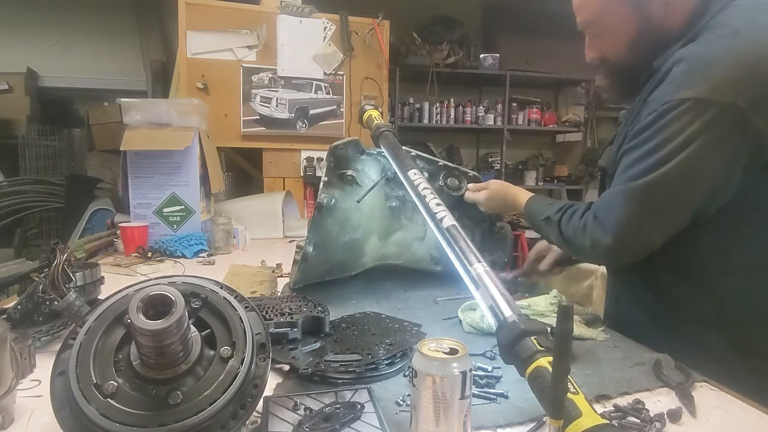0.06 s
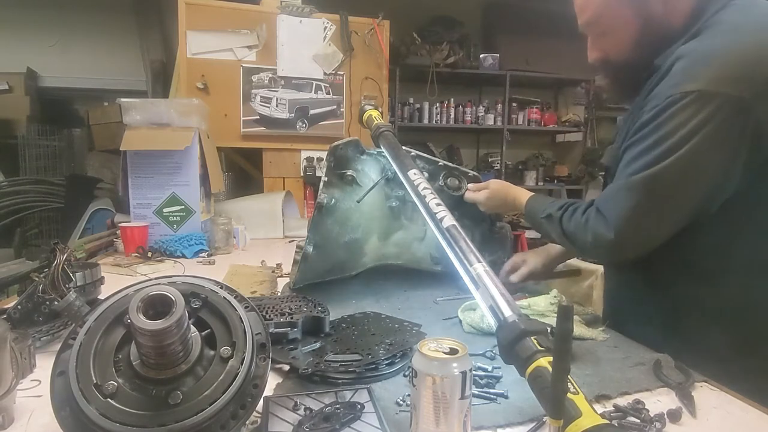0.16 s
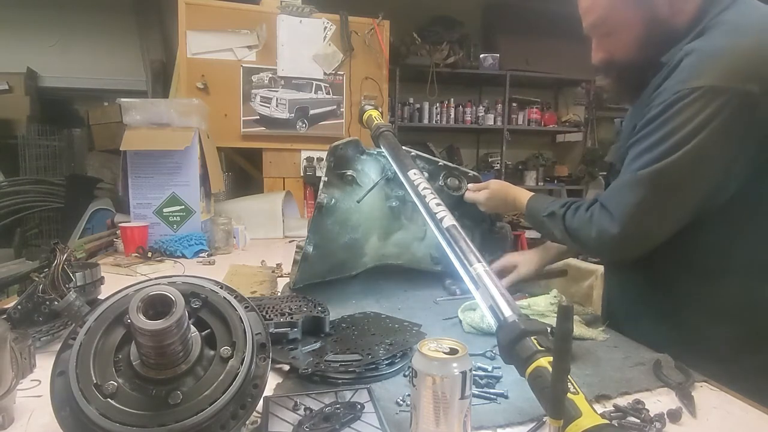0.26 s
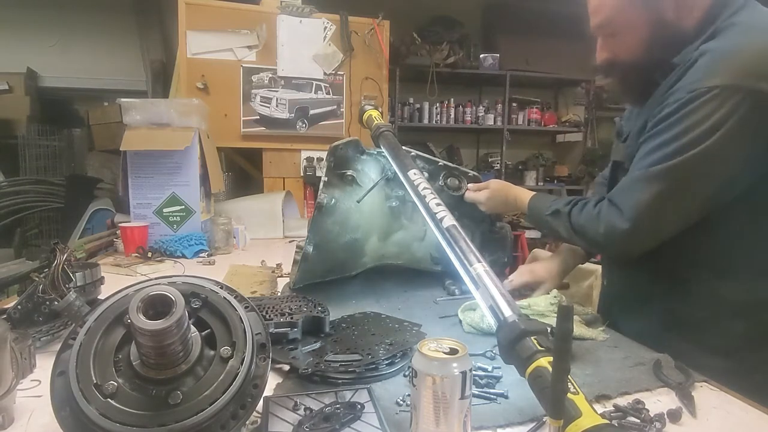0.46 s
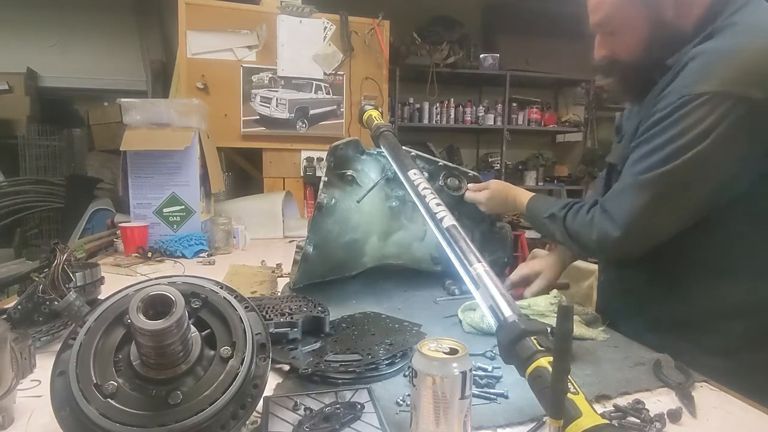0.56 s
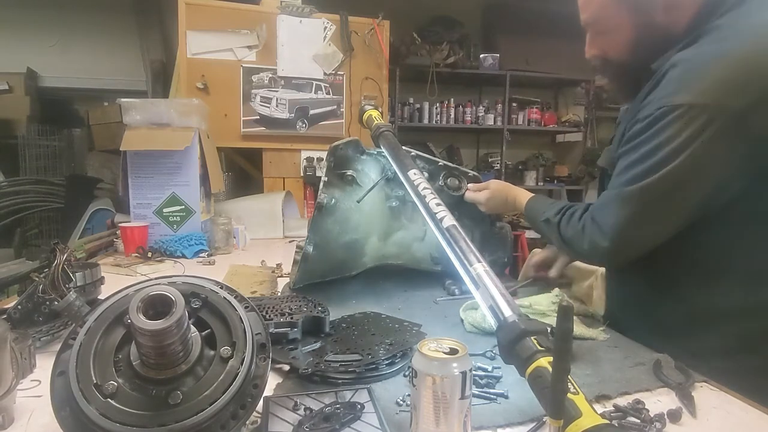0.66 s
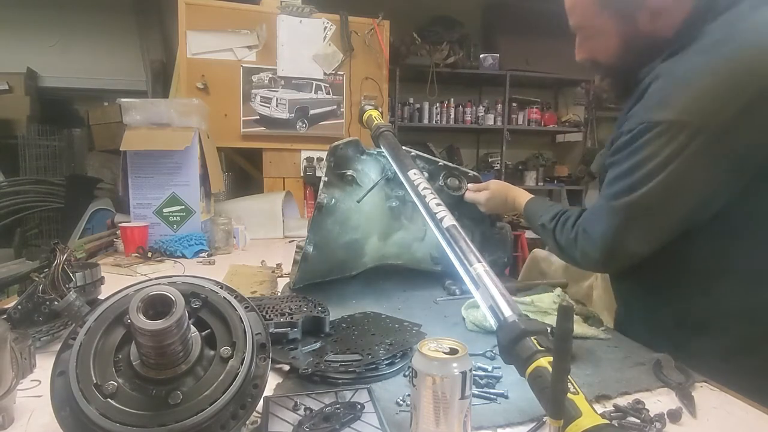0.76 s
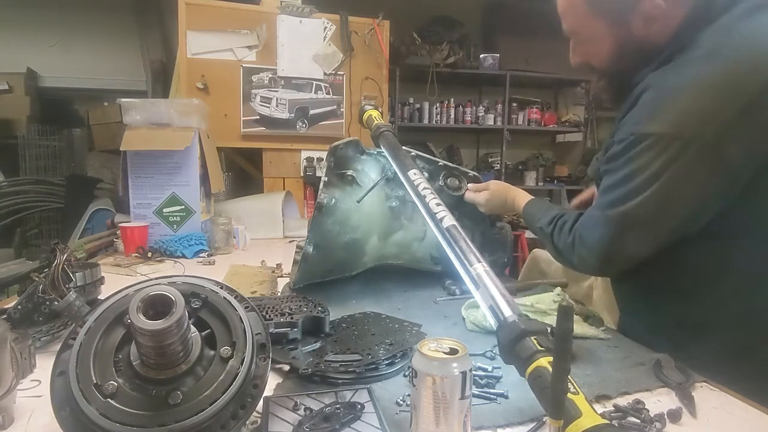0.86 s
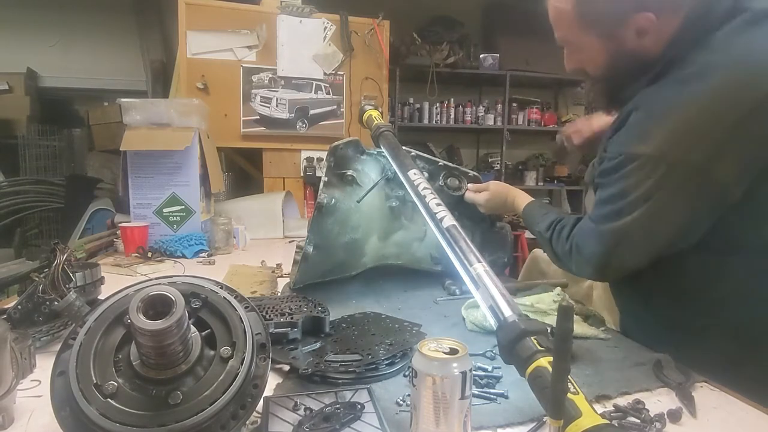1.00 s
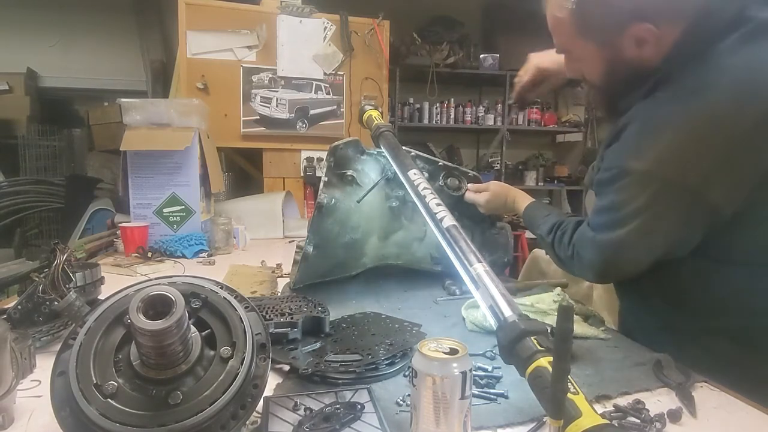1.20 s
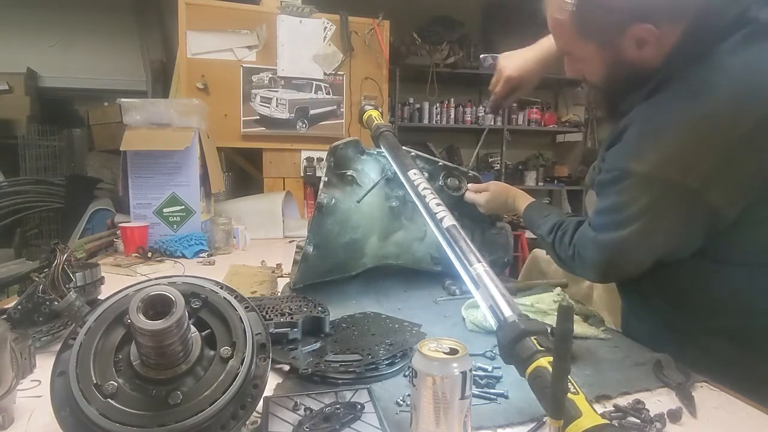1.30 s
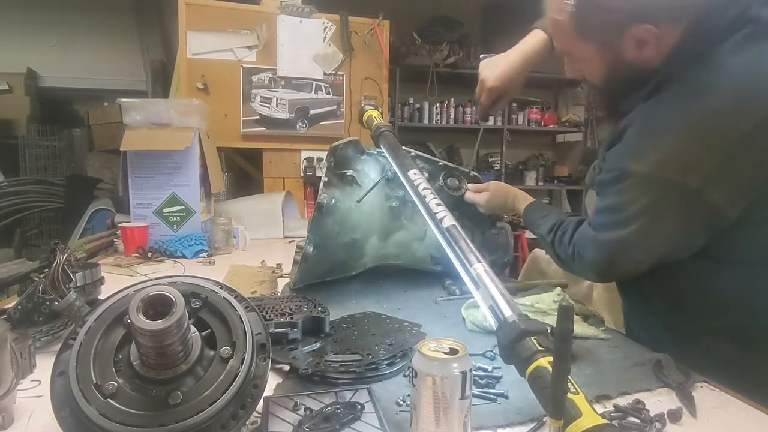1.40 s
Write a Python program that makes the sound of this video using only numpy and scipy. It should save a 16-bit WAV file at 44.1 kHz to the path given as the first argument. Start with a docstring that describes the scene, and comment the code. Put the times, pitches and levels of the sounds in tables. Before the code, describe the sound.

A hammer is set down on a workbench: a chattering metal knock at 0.2 seconds, dull bumps around 0.3, a brief scrape, then a hard, ringing clunk just before 0.5. A steel punch slides with a faint ring near 0.9 seconds and lightly taps a metal case at about 0.8, 1.0 and 1.35. Sleeves swish softly over the low, steady hum of air in a small garage.

```python
"""A chattering knock on metal, over the low hum of air in a small garage: a hammer is being put down
on a cluttered workbench beside a metal gear case. It bumps the bench top, scrapes briefly in tiny slips
and lands with a hard, ringing clunk. Sleeves swish, a steel punch slides with a faint ring and taps
the case lightly. The clutter and the room answer the hits, and the treble flickers on the right."""
import sys
import numpy as np
from scipy import signal
from scipy.fft import rfft, irfft, next_fast_len
from scipy.io import wavfile

SR = 44100
rng = np.random.default_rng(int(sys.argv[2]) if len(sys.argv) > 2 else 0)


def int16_out(signal):
    """Quantize to a 16-bit WAV file."""
    q = np.round(np.clip(np.atleast_2d(signal).T, -1, 1) * 32767)
    wavfile.write(sys.argv[1], SR, q.astype(np.int16))


N = 63945
SIDES = np.array([[.5], [-.5]])  # left and right share of a pan or a lag


def amp(db):
    """Decibels to gain."""
    return 10 ** (np.asarray(db) / 20)


def unit(x):
    """Scale to rms 1."""
    return x / np.sqrt(np.mean(x ** 2) + 1e-20)


def clock():
    """Time of each sample in seconds."""
    return np.arange(N) / SR


def along(curve, hz):
    """Read a curve of (freq_hz, value) points on a log frequency axis."""
    freqs, values = np.transpose(curve)
    return np.interp(np.log(hz + 1), np.log(freqs + 1), values)


def filtered(x, response):
    """EQ x with a gain given as a function of frequency."""
    size = next_fast_len(N + SR // 2)
    return irfft(rfft(x, size) * response(np.fft.rfftfreq(size, 1 / SR)), size)[..., :N]


# How alike the two sides of a noise are: freq_hz, correlation
STEREO_LIKENESS = [(60, 0.96), (130, .88), (290, .75), (640, 0.65), (1400, 0), (15000, 0.011)]
def noise(spectrum):
    """Coloured stereo noise of rms 1, centred in the bass and wide in the treble."""
    def mid_side_eq(hz):
        angle = np.arccos(np.clip(along(STEREO_LIKENESS, hz), -1, 1)) / 2
        return amp(along(spectrum, hz)) * [np.cos(angle), np.sin(angle)]
    mid, side = filtered(rng.standard_normal((2, N)), mid_side_eq)
    return unit(np.array([mid + side, mid - side]))


def place(x, pan_db, lag_ms=0):
    """Make the left louder by pan_db and later by lag_ms."""
    lag_s = lag_ms / 1000
    return amp(pan_db * SIDES) * filtered(x, lambda hz: np.exp(-2j * np.pi * hz * lag_s * SIDES))


def swell(peak_s, width_s):
    """A bell-shaped rise and fall."""
    return np.exp(-.5 * ((clock() - peak_s) / width_s) ** 2)


def ring(contacts, modes, attack_cycles):
    """Every contact starts the modes anew; a long, soft contact misses the high ones."""
    t = np.arange(SR // 4) / SR
    out = np.zeros((2, N))
    for start_s, level_db, contact_ms in contacts:
        contact_s = contact_ms / 1000
        body = 0
        for hz, mode_db, t60_s, pan_db in modes:
            decay = amp(level_db + mode_db - 60 * t / t60_s + pan_db * SIDES)
            attack = 1 - np.exp(-(hz * t / attack_cycles) ** 2)
            softening = 1 + (np.pi * hz * contact_s) ** 2
            body += attack * decay * np.sin(2 * np.pi * hz * t) / softening
        out += [np.interp(clock() - start_s, t, side, left=0, right=0) for side in body]
    return out


def crack(contacts, spectrum, t60_s, rise_s=0.003):
    """A short burst of noise at every contact."""
    envelope = 0
    for start_s, level_db, _ in contacts:
        age = clock() - start_s
        envelope += np.clip(age / rise_s, 0, 1) * amp(level_db - 60 * abs(age) / t60_s)
    return noise(spectrum) * envelope


def radiate(x, low_hz):
    """Low cut: a body sheds little sound below its lowest mode."""
    return signal.sosfilt(signal.butter(2, low_hz, 'high', fs=SR, output='sos'), x)


# EQ of the room tone and of the hiss: freq_hz, gain_db
AIR_EQ = [(20, -26), (45, -0.5), (62, 9), (110, 5), (170, -2), (280, -2), (450, -9.5), (1000, -11),
          (2500, -15), (6000, -20.5), (10000, -24.5), (16000, -46)]
HISS_EQ = [(300, -63), (5000, -19.5), (8500, -10), (12000, -6), (15000, 1), (16500, -1.5)]
# Fader moves on the hiss, ahead of its trim: time_s, level_db
HISS_FADER = [(0.0, -70), (0.176, -66), (0.302, -56.5), (0.314, -50), (0.322, -51), (0.366, -51),
              (0.394, -66.5), (0.406, -52), (0.444, -65), (0.472, -56), (0.48, -69), (0.496, -62),
              (0.524, -67), (0.726, -75), (0.786, -59.5), (0.84, -66.5), (0.98, -66.5), (1.05, -61),
              (1.142, -76.5), (1.19, -63), (1.34, -68.5), (1.45, -68.5)]
def background(air_db=-54, hiss_trim_db=-2):
    """Steady workshop air, and a thin treble hiss that flickers on the right."""
    times, levels_db = np.transpose(HISS_FADER)
    hiss = amp(np.interp(clock(), times, levels_db) + hiss_trim_db) * noise(HISS_EQ)
    air = amp(air_db) * noise(AIR_EQ)
    return place(air, pan_db=1) + place(hiss, pan_db=-12.5)


# Tone of the reverb: freq_hz, gain_db
ROOM_EQ = [(40, -1), (200, 1.5), (400, 0), (650, 0.5), (1200, 2), (2500, -0.5), (16000, -6)]
# Length of its tail: freq_hz, t60_s
ROOM_DECAY = [(100, 1), (220, 1), (650, 0.28), (2500, 0.47), (6000, 0.47), (14000, 0.2)]
def garage(x, early_db, tail_db, early_t60_s=0.092, predelay_s=0.0047):
    """Add quick reflections from the clutter and the tail of the room."""
    t = clock()
    hz, frame_s, bands = signal.stft(noise(ROOM_EQ), SR, nperseg=256)
    decay = amp(-60 * frame_s / along(ROOM_DECAY, hz)[:, None])
    tail = signal.istft(bands * decay, SR, nperseg=256)[1][:, :N]
    early = noise(ROOM_EQ) * amp(-60 * t / early_t60_s)
    arrived = t > predelay_s
    impulse = (amp(early_db) * unit(early * arrived) + amp(tail_db) * unit(tail * arrived)) / np.sqrt(N)
    return x + signal.fftconvolve(x, impulse, axes=1)[:, :N]


# Tone of the cloth: freq_hz, gain_db
CLOTH_EQ = [(200, -2), (470, 5.5), (640, 0), (850, -5.5), (1260, 2), (1700, -7), (2400, 0.5), (4000, -5.5),
            (7000, -11), (11000, -24), (16000, -23)]
# Arm moves: peak_s, width_s, level_db
ARM_MOVES = [(0.305, 0.086, -50.5), (.60, 0.027, -54), (1.019, 0.052, -50.5)]
def sleeves():
    """Cloth swishes with each move of the arm."""
    return noise(CLOTH_EQ) * sum(amp(db) * swell(peak_s, width_s) for peak_s, width_s, db in ARM_MOVES)


def punch_slide(pitch_hz=2240, peak_s=0.871, rise_s=0.046, fade_s=0.14, level_db=-60):
    """The steel punch sings with a fluttering, raspy tone as it slides."""
    t = clock()
    rasp_half_width_hz, rasp_db = 100, 1
    flutter_hz, flutter_depth = 150, .35
    rasp_band = lambda hz: 1 / (1 + ((hz - pitch_hz) / rasp_half_width_hz) ** 2)
    rasp = unit(filtered(rng.standard_normal((2, N)), rasp_band))
    flutter = unit(filtered(rng.standard_normal(N), lambda hz: 1 / (1 + (hz / flutter_hz) ** 4)))
    tone = unit(np.sin(2 * np.pi * pitch_hz * t))
    singing = unit((1 + flutter_depth * flutter) * (tone + amp(rasp_db) * rasp))
    stroke = np.where(t < peak_s, swell(peak_s, rise_s), np.exp(-abs(t - peak_s) / fade_s))
    return place(amp(level_db) * stroke * singing, pan_db=1.5, lag_ms=0.066)


# Light touches of the punch: start_s, level_db, contact_ms
TAP_HITS = [(.780, -52, 0.33), (.798, -53.5, 0.21), (.990, -48, .05), (1.353, -51.5, 0.19)]
# Ring of the gear case: pitch_hz, level_db, t60_s, pan_db
CASE_RING = [(282, -4, 0.055, 1), (661.5, -4.5, 0.1, -1.5), (760, -7.5, 0.084, 4), (1253, -3, 0.062, 4)]
def punch_taps():
    """The punch touches the case lightly and sets it ringing."""
    return garage(ring(TAP_HITS, CASE_RING, attack_cycles=0.56), early_db=-2, tail_db=-16)


# Tone of the friction: freq_hz, gain_db
SCRAPE_EQ = [(100, -21), (250, 5.5), (450, 1), (1500, -2), (2400, 1), (3200, -2), (5000, -10),
             (7500, -24.5), (10000, -35), (16000, -52.5)]
# Resonant peaks of the sliding steel: centre_hz, half_width_hz, boost_db
STEEL_PEAKS = [(2290, 26, 11.5), (3270, 90, 6.5), (8160, 49, 19.5), (12000, 80, 19.5), (14980, 78, 7.5)]
def hammer_scrape(start_s=.4027, end_s=0.4578, release_s=0.0071, level_db=-27.5, fade_db=3.5):
    """Steel slides over the bench in dense tiny slips, fading as it slows before the landing."""
    t = clock()
    slips_per_s, grit_above_hz = 2500, 700
    progress = np.clip((t - start_s) / (end_s - start_s), 0, 1)
    release = np.exp(-np.maximum(t - end_s, 0) / release_s)
    stroke = (t > start_s) * amp(level_db - fade_db * progress ** 2) * release
    slips = (rng.random(N) < slips_per_s / SR) * rng.standard_normal((2, N))
    grit = unit(filtered(slips, lambda hz: amp(along(SCRAPE_EQ, hz)) * (hz > grit_above_hz)))
    friction = noise(SCRAPE_EQ) + 0.31 * grit
    steel = lambda hz: amp(sum(db / (1 + ((hz - peak) / width) ** 2) for peak, width, db in STEEL_PEAKS))
    return garage(stroke * unit(filtered(friction, steel)), early_db=-10.5, tail_db=-13)


# Bumps on the bench top: start_s, level_db, contact_ms
BUMP_HITS = [(.248, -24, 3.4), (.3165, -15, 0.174), (.3280, -18.5, 2), (.3455, -25.5, 0.79),
             (.3570, -37, 2.9), (.489, -25, 1.6), (.891, -41, 0.51), (.915, -56.5, 2)]
# Low boom of the bench top: pitch_hz, level_db, t60_s, pan_db
BENCH_RING = [(71, -3.5, 0.15, 1), (102, 3.5, 0.071, 0.5), (174.6, -1.5, 0.067, 3),
              (225.7, -4.5, 0.085, -2), (254.7, -3, 0.065, 2.5)]
# Tone of the sharp touch just before the hardest bump: freq_hz, gain_db
TICK_EQ = [(300, 10.5), (1500, 1.5), (3500, 1), (7000, -7.5), (16000, -5.5)]
def bench_bumps(tick_s=.3155, tick_width_s=0.0016, tick_db=-30.5):
    """The bench top thuds at each bump; a tick gives the hardest one its edge."""
    thud = radiate(ring(BUMP_HITS, BENCH_RING, attack_cycles=0.65), low_hz=55)
    tick = amp(tick_db) * swell(tick_s, tick_width_s) * noise(TICK_EQ)
    return garage(thud + place(tick, pan_db=-0.5), early_db=-13, tail_db=-21)


# Chatter of the opening knock: start_s, level_db, contact_ms
KNOCK_HITS = [(.2203, -28.5, 0.036), (.2245, -19, 0.073), (.2275, -18, 0.21), (.2352, -29, 0.1)]
# Ring of the damped metal: pitch_hz, level_db, t60_s, pan_db
KNOCK_RING = [(266.5, -4, 0.05, -0.5), (388, -2.5, .03, -4), (680, -9.5, 0.04, 8.5), (754, -5, .055, 0),
              (930, 5, 0.017, -3), (1036, -1, .033, 7), (1165, -21, 0.06, 0.5), (1394, -12.5, 0.029, -26.5),
              (1920, -6.5, 0.03, 13), (2180, -14, 0.12, -8.5), (3110, -18.5, 0.056, 8.5),
              (4260, -19, .06, 10)]
# Tone of its noisy attack: freq_hz, gain_db
KNOCK_EQ = [(40, -35.5), (250, 12), (1000, 3.5), (2400, -17), (4200, -5.5), (5200, -28), (16000, -30.5)]
def hammer_knock():
    """The hammer chatters against damped metal."""
    body = radiate(ring(KNOCK_HITS, KNOCK_RING, attack_cycles=0.43), low_hz=200)
    attack = amp(-12.5) * crack(KNOCK_HITS, KNOCK_EQ, t60_s=.04)
    return garage(place(body, pan_db=1.1, lag_ms=0.092) + attack, early_db=-20, tail_db=-22.5)


# The hammer lands and settles: start_s, level_db, contact_ms
CLUNK_HITS = [(.4620, -24, .15), (.4680, -5, .1), (.4695, 1, .04), (.4760, -34, .2), (.4815, -23, .05),
              (.4925, -18.5, .35), (.529, -26, 0.49)]
# Body of the landing: pitch_hz, level_db, t60_s, pan_db
CLUNK_RING = [(195.9, -21.5, 0.24, -4), (275.1, -15, 0.14, 0.5), (308, -6, 0.067, 0.5),
              (515, -19.5, 0.08, 6.5), (646, 2, 0.022, 1.5), (808, -10, 0.028, -16),
              (1029, -4.5, 0.031, 2.5), (1192, -15, 0.029, -8), (1850, -14.5, 0.0094, 7.5),
              (2270, -18.5, .014, -6)]
# Tone of its noisy attack, and of the steel-on-steel snap at the hardest hit: freq_hz, gain_db
CLUNK_EQ = [(40, -39), (120, -22), (250, -5), (600, -6), (1200, 3.5), (2500, -59), (4500, -45),
            (8000, -50.5), (16000, -60)]
SNAP_EQ = [(300, -29), (1200, -4), (2100, 2.5), (3000, -7.5), (4500, -24), (8000, -26.5), (16000, -47.5)]
def hammer_clunk(snap_s=.4708, snap_width_s=0.0011, snap_db=-21):
    """The hammer head lands with a steel snap, a little to the right, and rocks to rest."""
    body = ring(CLUNK_HITS, CLUNK_RING, attack_cycles=0.7)
    attack = amp(-22.5) * crack(CLUNK_HITS, CLUNK_EQ, t60_s=.045)
    snap = amp(snap_db) * swell(snap_s, snap_width_s) * noise(SNAP_EQ)
    landing = radiate(body + attack, low_hz=215) + snap
    return garage(place(landing, pan_db=-0.5, lag_ms=.26), early_db=-18.5, tail_db=-23)


def scene():
    """Mix the hammer, the punch and the sleeves over the room tone."""
    hammer = hammer_knock() + bench_bumps() + hammer_scrape() + hammer_clunk()
    return hammer + punch_slide() + punch_taps() + sleeves() + background()


def record(dry, high_cut_hz=16100):
    """Clip at full scale, then apply a steep high cut."""
    clipped = np.clip(dry, -1, 1)
    return filtered(clipped, lambda hz: 1 / (1 + (hz / high_cut_hz) ** 160))


dry = scene()
out = record(dry)
int16_out(out)
```